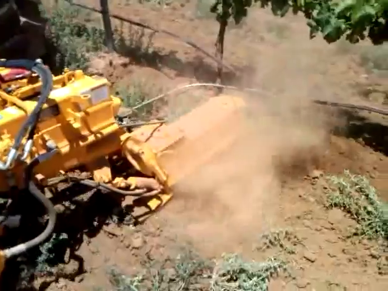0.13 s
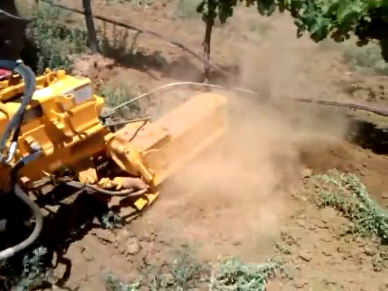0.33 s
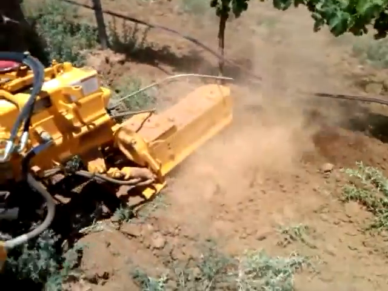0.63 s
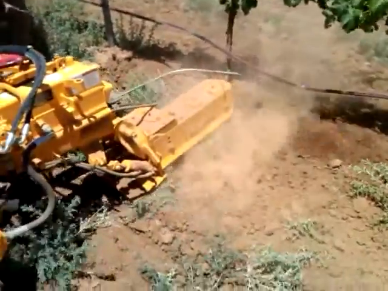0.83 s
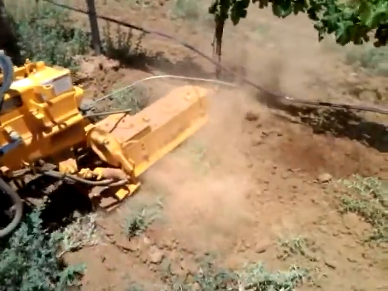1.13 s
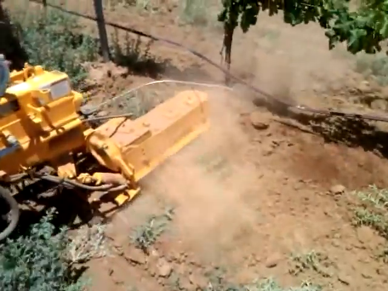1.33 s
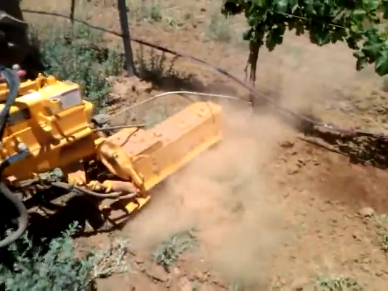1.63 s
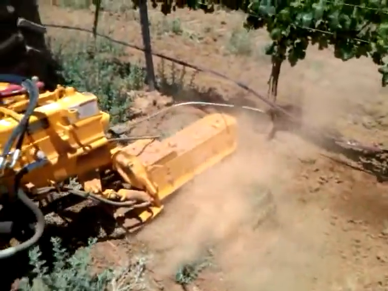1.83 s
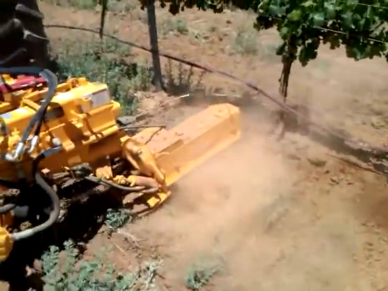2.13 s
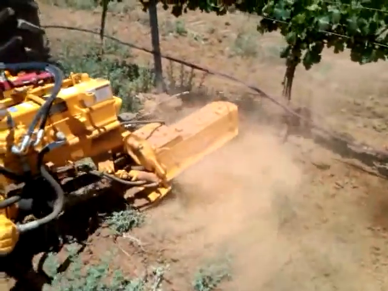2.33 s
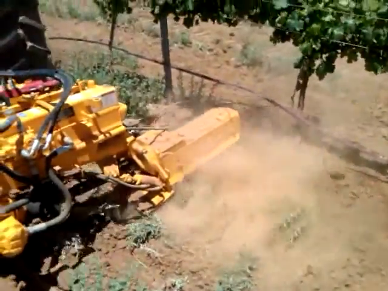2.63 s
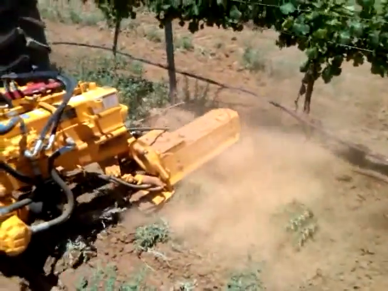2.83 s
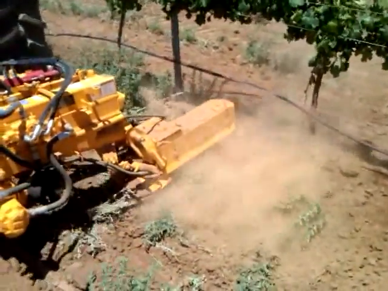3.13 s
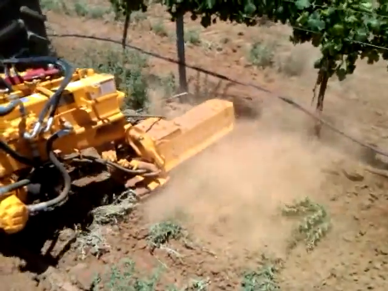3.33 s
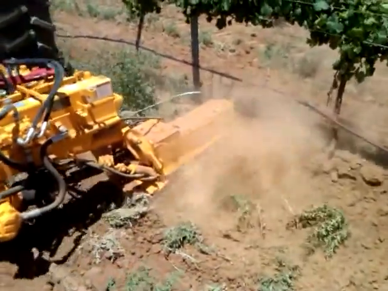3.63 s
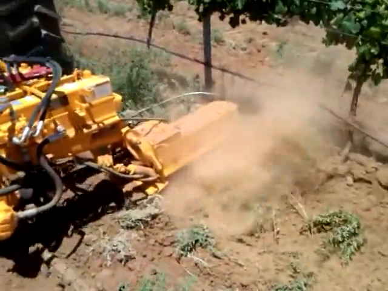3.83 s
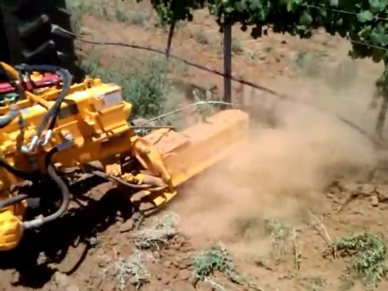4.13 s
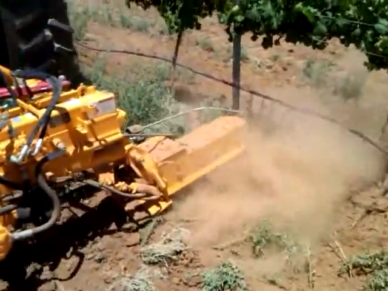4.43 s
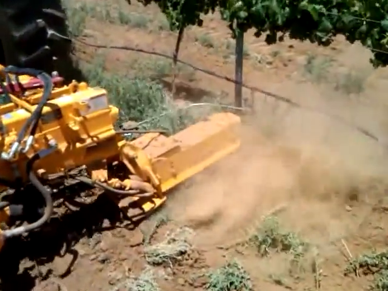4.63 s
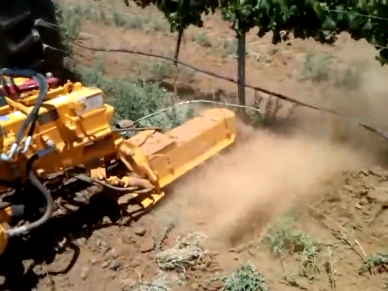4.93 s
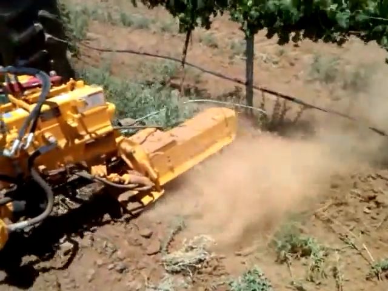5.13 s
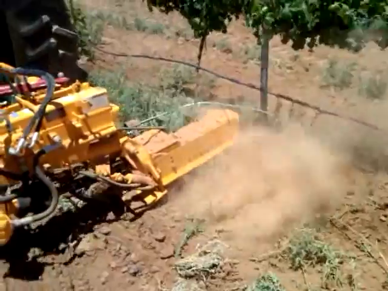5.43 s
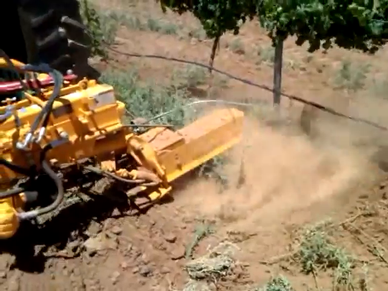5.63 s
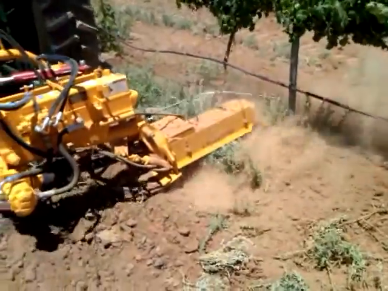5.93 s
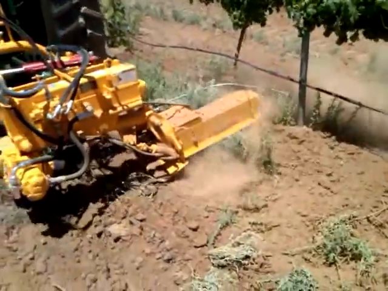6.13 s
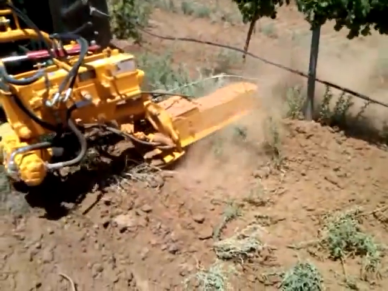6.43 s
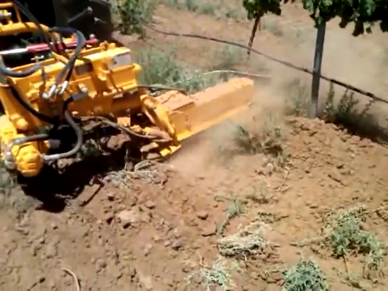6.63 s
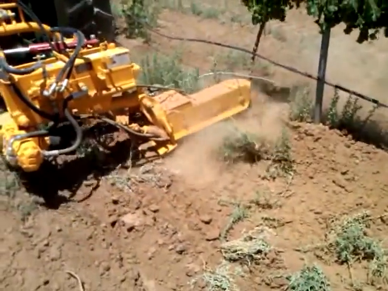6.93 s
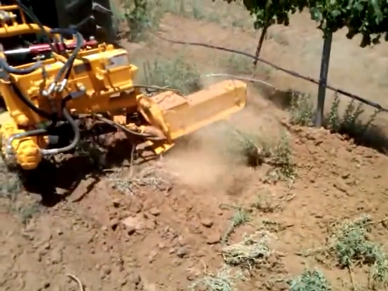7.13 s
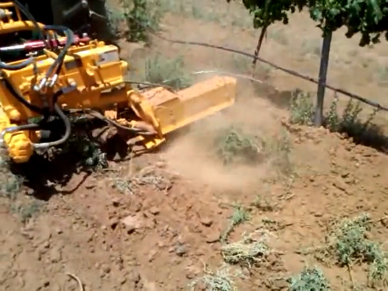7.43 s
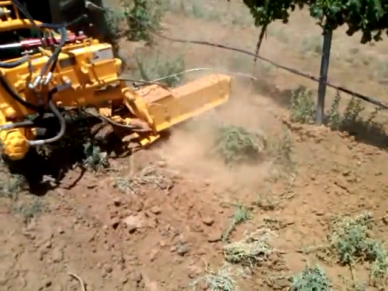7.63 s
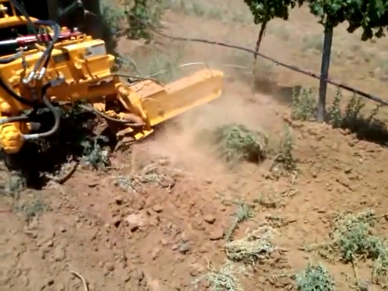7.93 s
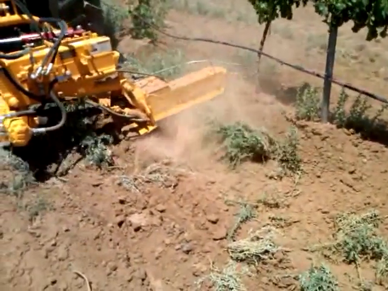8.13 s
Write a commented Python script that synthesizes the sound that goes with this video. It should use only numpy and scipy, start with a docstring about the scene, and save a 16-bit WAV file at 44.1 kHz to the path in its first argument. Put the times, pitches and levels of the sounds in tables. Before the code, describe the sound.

After a tiny silence, sound snaps on: low engine drone, crunching earth and grit spraying in quick rhythmic pulses, about seven a second. Steel rattles, stones ring dully and lumps of soil knock the hood. Rough wind rumble covers the opening and returns in the second half, where the clinks stop. Narrow, compressed phone sound, dry open air, treble flickering; the machine softens as it draws away.

```python
"""A tractor creeps along a vine row with a side-mounted rotary tiller, heard from a hand-held phone.
After a brief silence a click opens onto diesel drone, pump hum, gearbox whine, churned earth and strong wind.
For five seconds tines clink on stones and grit sprays once a turn; from the first second clods thud on the hood.
After a calmer spell, gusts return near 5 s, with a second click and spells of thin frozen treble.
Then the tractor draws away. Noise is shaped by spectra, struck parts are decaying sines, eddies are low pushes."""
import sys
import numpy as np
from scipy import signal
from scipy.fft import rfft, irfft, next_fast_len
from scipy.io import wavfile
from scipy.ndimage import uniform_filter1d, minimum_filter1d, map_coordinates

SR = 44100
rng = np.random.default_rng(int(sys.argv[2]) if len(sys.argv) > 2 else 0)


def put_to_file(sound):
    """Save the sound as 16-bit audio at rate SR, in the file named by the first command-line argument."""
    columns = np.atleast_2d(sound).T  # one column per channel
    safe = np.clip(columns, -1, 1)
    whole_steps = np.round(safe * 32767)
    wavfile.write(sys.argv[1], SR, whole_steps.astype(np.int16))


def makeup_ratio(level_db):
    """Linear amplitude ratio for a level in decibels (20 dB per factor of ten)."""
    decades = np.asarray(level_db, float) / 20
    return 10 ** decades


N = 365148

# engine loudness at the microphone as the tractor draws away: start_s [s], level_db [dB]
TRACTOR_LEVEL = [(0.1, -38), (1.0, -38), (1.7, -37.5), (2.7, -39), (4.0, -38), (5.3, -39.5), (6.3, -39),
                 (8.28, -42)]
# modes of the hood over the rotor: pitch_hz [Hz], level_db [dB], t60_s [s]
HOOD_MODES = [(694.7, -7, 0.17), (810.5, 4, 0.08), (950, -2, 0.06), (1248, -7.5, 0.12), (1847, -4.5, 0.046)]


def unit(x):
    """Scale to rms 1."""
    return x / np.sqrt(np.mean(x ** 2) + 1e-20)


def curves(rows):
    """One value per sample for each column after the time."""
    s, *cols = np.transpose(rows)
    return [np.interp(np.arange(N) / SR, s, c) for c in cols]


def wobble(rate):
    """A smooth random curve, rate knots a second (at most 200)."""
    knots = rng.standard_normal(N // 200)
    return map_coordinates(knots, [np.arange(N) * min(rate, 200) / SR])


def filtered(x, response):
    """x times a response of frequency."""
    m = next_fast_len(N + SR // 2)
    return irfft(rfft(x, m) * response(np.fft.rfftfreq(m, 1 / SR)), m)[:N]


def coloured(x, spectrum):
    """x shaped by (Hz, dB) points on a log axis, rms 1."""
    f, db = np.transpose(spectrum)

    def response(hz):
        return makeup_ratio(np.interp(np.log(hz + 1), np.log(f + 1), db, -120, -120))

    return unit(filtered(x, response))


def patchy(patchy_db, size=5):
    """White noise with patches of random gain in time and frequency."""
    z = signal.stft(rng.standard_normal(N), nperseg=512)[2]
    field = uniform_filter1d(rng.standard_normal(z.shape), size=size, axis=0)
    field = uniform_filter1d(field, size=size, axis=1)
    return signal.istft(z * makeup_ratio(patchy_db * unit(field)), nperseg=512)[1][:N]


def grains(per_s, spread_db):
    """Random impulses of either sign and uneven size, rms 1; spread_db makes a few much larger."""
    hit = rng.random(N) < per_s / SR
    size_db = spread_db * np.minimum(rng.exponential(size=N), 4)
    return unit(hit * rng.choice([-1, 1], N) * makeup_ratio(size_db))


def ring(modes, t, scatter_db, detune):
    """All modes of a struck part, at new strengths and slightly new pitches for each blow."""
    out = 0
    for hz, db, t60 in modes:
        decay = makeup_ratio(db + scatter_db * rng.standard_normal() - 60 * t / t60)
        out = out + decay * np.sin(2 * np.pi * hz * (1 + detune * rng.standard_normal()) * t)
    return out


def tractor():
    """Diesel drone pulsing with the firings, the pump's wavering hum, the cooling fan's hiss."""
    # spectrum of the diesel drone: freq_hz [Hz], density_db [dB per Hz, relative]
    drone_spectrum = [(15, -39), (25, -6), (70, -21), (106, -10), (135, -10.5), (171, -17), (187, -19),
                      (208, -24.5), (244, -29.5), (275, -17), (301, -5.5), (407, -7.5), (494, -13.5),
                      (521, -45.5), (569, -13.5), (660, -5), (796, -3), (1000, -6), (1150, -12),
                      (1700, -20), (2210, -33.5), (3740, -120)]
    # exhaust tones: multiple [of the firing rate], level_db [dB relative to the drone]
    exhaust_tones = [(2, -10), (3, -14), (6, -16)]
    # spectrum of the cooling fan: freq_hz [Hz], density_db [dB per Hz, relative]
    fan_spectrum = [(1760, -40.5), (3000, -11), (3310, -13.5), (3790, -4), (4440, -13), (5500, -9),
                    (5900, -4.5), (7030, -4), (7450, -24), (7600, -22.5), (9880, -59.5), (16700, -120)]
    firing_hz, block_t60_s = 50.98, .12  # the engine block rings on after each firing
    pump_hz, pump_db, fan_db = 186, -42.5, -66.5
    level_db, = curves(TRACTOR_LEVEL)
    cycle = 2 * np.pi * np.cumsum(firing_hz * (1 + 0.008 * wobble(6))) / SR
    pulsing = 1 + 0.12 * np.cos(cycle) + 0.039 * np.cos(cycle / 2)  # cylinders differ
    knocks = 0.47 * grains(per_s=120, spread_db=0.0)  # linkage and clods rattling

    fired = np.diff(np.floor(cycle / (2 * np.pi)), prepend=0)  # one impulse per firing
    fired = fired * (1 + .6 * np.cos(cycle / 2)) * makeup_ratio(1.5 * wobble(40))
    t = np.arange(SR // 8) / SR
    block_echo = rng.standard_normal(len(t)) * makeup_ratio(-60 * t / block_t60_s)
    block = unit(signal.fftconvolve(fired, block_echo)[:N])

    roar = unit(pulsing * patchy(patchy_db=2.0, size=4))
    drone = coloured(0.5 * block + roar + knocks, drone_spectrum)
    exhaust = sum(makeup_ratio(db + 2.1 * wobble(8.4)) * np.sin(k * cycle) for k, db in exhaust_tones)
    engine = makeup_ratio(level_db + 0.8 * wobble(9)) * (drone + exhaust)
    hum = np.sqrt(2) * np.sin(2 * np.pi * np.cumsum(pump_hz + .6 * wobble(8)) / SR)
    fan = coloured(pulsing * rng.standard_normal(N), fan_spectrum)
    return engine + makeup_ratio(pump_db + 0.83 * wobble(13)) * hum + makeup_ratio(fan_db) * fan


def gearbox():
    """Meshing teeth: a faint whine and its overtones, wavering with the load."""
    # rotor gearbox whine: start_s [s], pitch_hz [Hz], level_db [dB before the overtone balance]
    whine_course = [(0.1, 665, -56.5), (2, 664, -53.5), (4, 667.6, -60.5), (6, 663.7, -49),
                    (8.28, 665.6, -53.5)]
    # whine overtones: multiple [of the whine pitch], level_db [dB relative]
    whine_overtones = [(1, 4), (2, -3.5), (3, -10)]
    hz, db = curves(whine_course)
    phase = 2 * np.pi * np.cumsum(hz + 12 * wobble(25) + 5 * wobble(3)) / SR
    whine = sum(makeup_ratio(level + 3.7 * wobble(20)) * np.sin(k * phase) for k, level in whine_overtones)
    return makeup_ratio(db) * whine


def tiller():
    """The rotor churns earth; grit sprays against the hood, with a swing in level once a turn."""
    # thrown soil: start_s [s], level_db [dB], swing_db [dB per unit of the throw curve]
    soil_course = [(0.1, -49, -16), (0.3, -51.5, 8), (0.85, -52.5, -1), (1.05, -48.5, -1.5), (1.72, -50, 7),
                   (1.8, -56, 8), (2.3, -50.5, 4), (2.42, -56.5, 8), (2.75, -59.5, -4), (2.82, -54, 17),
                   (3.02, -55, -10), (3.1, -58.5, -12), (3.55, -56.5, 4), (4.05, -50.5, 8),
                   (4.25, -55.5, 7), (4.6, -51.5, 3), (4.75, -57, 17), (5.1, -58, 2.5), (5.45, -60, 3.5),
                   (6.4, -64.5, -3.5), (8.28, -72.5, -2.5)]
    # how hard the tines bite: start_s [s], churn_db [dB at the usual soil level]
    bite_course = [(0.1, -46), (0.6, -51), (1.2, -47.5), (2.4, -48.5), (3.4, -48.5), (4.2, -46.5),
                   (5.0, -46), (5.3, -48.5), (6.5, -48), (8.28, -49)]
    # spectrum of churned earth: freq_hz [Hz], density_db [dB per Hz, relative]
    churn_spectrum = [(710, -51.5), (1200, -6), (1330, -2.5), (1720, -6.5), (2000, -6), (2400, -10.5),
                      (2600, -14), (3210, -20), (3600, -24), (4680, -58), (7920, -120)]
    # spectrum of sprayed grit: freq_hz [Hz], density_db [dB per Hz, relative]
    soil_spectrum = [(1880, -22), (3200, -21), (3400, -12), (4030, -3.5), (4340, -1), (5050, -1.5),
                     (6300, 3), (7250, -6), (7600, -7.5), (9880, -52.5), (16700, -120)]
    first_throw_s, turn_s = 0.2186, 0.13627
    throw_rise, throw_fall = 0.15, 0.52  # in turns
    churn_follows, usual_soil_db = 0.36, -52.5  # the churn swings less than the thrown soil
    soil_db, swing_db = curves(soil_course)
    turn = (np.arange(N) / SR - first_throw_s) / turn_s % 1
    throw = np.exp(-turn / throw_fall) + np.exp((turn - 1) / throw_rise)
    soil_db = soil_db + swing_db * (throw - throw.mean()) + 1.4 * wobble(12)
    churn_db = curves(bite_course)[0] + churn_follows * (soil_db - usual_soil_db)

    clumps = wobble(30)
    churn = patchy(patchy_db=1.5, size=4) + .5 * grains(per_s=300, spread_db=2.0)
    churn = coloured(churn, churn_spectrum)
    soil = coloured(patchy(patchy_db=2.3) + .35 * grains(per_s=460, spread_db=7.0), soil_spectrum)
    return makeup_ratio(churn_db + 1.3 * clumps) * churn + makeup_ratio(soil_db + 0.5 * clumps) * soil


def rattle():
    """Loose steel pins, links and tines knock at random; each knock is one short decaying note."""
    per_s, low_hz, high_hz = 70, 620, 2600
    base_db, tilt_db, t60_s = -49, -5.5, 0.092  # base at 1 kHz, tilt per octave, mean t60
    when, pitch, size, life = rng.random((int(per_s * N / SR), 4)).T[..., None]
    hz = low_hz * (high_hz / low_hz) ** pitch
    t = np.arange(SR // 10) / SR
    strike_db = base_db + tilt_db * np.log2(hz / 1000) - 3.5 * np.log(size + .02)
    decay_db = -60 * t / (t60_s * (.5 + life))
    notes = makeup_ratio(strike_db + decay_db) * (1 - np.exp(-t / 0.0032)) * np.sin(2 * np.pi * hz * t)
    at = (when * N).astype(int) + np.arange(len(t))
    level_db, = curves(TRACTOR_LEVEL)
    return makeup_ratio(level_db - level_db.mean()) * np.bincount(at.ravel(), notes.ravel(), N + SR)[:N]


def gusting(law):
    """Level of one wind layer: calm air plus every gust's rise, hold and fall."""
    # gusts on the microphone: start_s [s], hold_s [s], level_db [dB before each layer's law],
    # speed [relative, about 0-1]
    gust_rows = [(0.144, 0.0087, -18.5, 0.57), (0.189, 0.015, -17, 0.74), (0.248, 0.017, -12, 0.64),
                 (0.319, 0.016, -12, 0.75), (0.359, 0.055, -14, 0.82), (0.459, 0.053, -12, 0.99),
                 (0.523, 0.13, -23, 1.08), (0.672, 0.069, -15.5, 1), (0.779, 0.08, -17.5, 0.9),
                 (0.831, 0.084, -14.5, 0.98), (0.99, 0.016, -24.5, 0.63), (1.023, 0.007, -32, 0.6),
                 (1.06, 0.0083, -24.5, 0.4), (1.159, 0.013, -31.5, 0.57), (1.267, 0.073, -42, 0.3),
                 (1.476, 0.12, -24.5, 0.08), (1.71, 0.06, -36.5, 0), (2.184, 0.061, -28, 0.14),
                 (2.433, 0.18, -41, 0.5), (2.776, 0.029, -31, 0.34), (2.86, 0.045, -28, 0.15),
                 (3.097, 0.013, -21.5, 0.38), (3.165, 0.02, -25.5, 0.1), (3.256, 0.071, -31, 0.12),
                 (3.859, .03, -46, 0.13), (4.357, 0.041, -38.5, 0.16), (4.541, 0.018, -34.5, 0.1),
                 (4.94, 0.034, -24.5, 0.51), (5.004, 0.029, -22, 0.13), (5.099, 0.03, -15, 0.6),
                 (5.17, 0.039, -22, 0.64), (5.228, 0.054, -10, 0.63), (5.307, 0.037, -14, 0),
                 (5.38, 0.014, -19, 0.77), (5.449, 0.07, -15.5, 0.65), (5.543, 0.018, -11.5, 0.25),
                 (5.63, 0.035, -17, 0.51), (5.71, .14, -17, 0.44), (5.897, 0.09, -14, 0.5),
                 (5.992, 0.085, -14.5, 0.51), (6.125, 0.12, -16.5, 0.43), (6.285, 0.011, -24, 0.32),
                 (6.358, 0.01, -30, 0.4), (6.315, 0.2, -35, 0.72), (6.531, 0.019, -23, 0.08),
                 (6.571, 0.02, -15, 0.6), (6.628, 0.022, -26, 0.67), (6.66, .03, -24.5, 0.52),
                 (6.738, .03, -30, 0.4), (6.786, 0.044, -33, 0.64), (6.858, 0.016, -25.5, 0.07),
                 (6.927, 0.039, -33, 0.09), (6.997, 0.016, -26.5, 0.02), (7.054, 0.025, -30, 0.18),
                 (7.107, 0.15, -34.5, 0.28), (7.266, 0.15, -39, 0.37), (7.447, 0.049, -27, 0.02),
                 (7.551, 0.021, -32, 0.37), (7.585, 0.023, -21.5, 0.06), (7.654, 0.084, -25, 0.03),
                 (7.768, 0.073, -21, 0.1), (7.912, 0.02, -29.5, 0.14), (8, 0.022, -29.5, 0.14),
                 (8.126, 0.015, -28, 0.66)]
    rise_db_per_s, fall_db_per_s = 649.5, 418
    over_db, speed_db, steep, calm_db = law
    s, hold, db, speed = np.transpose(gust_rows)[..., None]
    t = np.arange(0, N / SR, 1 / 300)
    rise_db = -rise_db_per_s * np.maximum(s - t, 0)
    fall_db = -fall_db_per_s * np.maximum(t - s - hold, 0)
    gust_db = db + over_db + speed_db * np.abs(speed) ** steep + rise_db + fall_db
    power = makeup_ratio(calm_db) ** 2 + np.sum(makeup_ratio(gust_db) ** 2, axis=0)
    return np.interp(np.arange(N) / SR, t, np.sqrt(power))


def shedding():
    """Eddies leave the microphone port in an unsteady train: a rough low tone gliding with the air."""
    # mean rate at which eddies peel off, one list for each spell of wind: start_s [s], rate_hz [Hz]
    shed_rates = [
        [(.14, 94.16), (.252, 69.8), (.306, 130), (.332, 100.7), (.39, 192.8), (.42, 240), (.45, 124.7),
         (.5, 170.2), (.53, 120), (.57, 189.9), (.612, 250), (.65, 150.5)],
        [(.66, 126.3), (.72, 110), (.76, 140.1), (.85, 105), (.91, 230.2), (.95, 150.3), (.984, 102.1),
         (1.02, 169.8), (1.07, 102), (1.172, 150.9), (1.2, 133.3)],
        [(1.44, 75.9), (1.508, 66), (1.57, 87), (1.65, 72)],
        [(3.08, 80), (3.152, 85.9), (3.202, 73.7), (3.234, 96.2), (3.306, 100), (3.35, 89)],
        [(4.9, 91.85), (5.024, 68.04), (5.1, 149.9), (5.18, 170), (5.226, 89.8), (5.274, 97.1), (5.338, 62.04),
         (5.37, 72.1)],
        [(5.38, 75), (5.47, 169.9), (5.5, 170.2), (5.532, 92.9), (5.57, 180), (5.6, 109.8), (5.652, 149.7),
         (5.706, 88.1), (5.79, 80), (5.86, 91.9)],
        [(5.87, 71.2), (5.91, 110.4), (5.94, 64.7), (6.0, 109.8), (6.08, 100), (6.13, 70.06), (6.194, 96.1),
         (6.294, 70.8), (6.35, 120.9)],
        [(6.5, 69.85), (6.53, 64.1), (6.568, 95), (6.588, 104.3), (6.648, 93), (6.7, 118), (6.72, 103.8)],
        [(7.55, 87), (7.6, 65.84), (7.654, 70.9), (7.684, 64.1), (7.722, 72), (7.774, 58.95), (7.9, 68.2)],
    ]
    hz, = curves(np.concatenate(shed_rates))
    unsteady_hz = hz * 2 ** (.14 * wobble(30) + .22 * wobble(110))
    phase = 2 * np.pi * np.cumsum(unsteady_hz) / SR
    tone = np.sin(phase) + 0.35 * np.sin(2 * phase + 1.2 * wobble(40))
    return unit(makeup_ratio(4.8 * wobble(60)) * tone)


def wind():
    """Eddies on the microphone port: slow rumble, with finer flutter and ripple as the air speeds up."""
    # spectrum of the slow eddies: freq_hz [Hz], density_db [dB per Hz, relative]
    rumble_spectrum = [(3, -10.5), (12, -2.5), (30, 3), (50, 1), (75, -4), (110, -7.5), (200, -35.5)]
    # spectrum of the faster eddies: freq_hz [Hz], density_db [dB per Hz, relative]
    flutter_spectrum = [(41, -27), (70, 2), (184, 4), (232, -2.5), (330, -12), (430, -45), (730, -120)]
    # spectrum of the finest eddies: freq_hz [Hz], density_db [dB per Hz, relative]
    ripple_spectrum = [(150, -28.5), (250, 0), (337, 1.5), (595, -12.5), (687, -13.5), (1100, -44),
                       (1430, -58.5), (2420, -120)]
    # laws: dB over the gust level at speed 0, dB added at speed 1, steepness, dB in calm air
    rumble_law, flutter_law = (-1, 1, 0, -47.5), (-13, 18.5, 0.57, -44)
    ripple_law, shed_law = (-21.5, 25.5, 1.12, -46.5), (-10, 18.5, 1.0, -61)
    eddies = grains(per_s=90, spread_db=2.5)  # each eddy pushes all bands at once
    lumps = makeup_ratio(2.8 * wobble(40))  # the air comes in lumps
    rumble = coloured(rng.standard_normal(N) + 0.47 * eddies, rumble_spectrum)
    rumble = unit(makeup_ratio(2.0 * wobble(12)) * rumble)
    flutter = unit(lumps * coloured(rng.standard_normal(N) + 0.57 * eddies, flutter_spectrum))
    ripple = coloured(rng.standard_normal(N) + 0.5 * eddies, ripple_spectrum)
    ripple = unit(lumps * makeup_ratio(1.8 * wobble(60)) * ripple)
    slow = gusting(rumble_law) * rumble + gusting(flutter_law) * flutter
    return slow + gusting(ripple_law) * ripple + gusting(shed_law) * shedding() + puffs()


def limited(x, top):
    """A fast limiter: most of the gain cut needed, held over some 11 ms, smoothed."""
    need = np.minimum(1, top / (np.abs(x) + 1e-9)) ** .8
    return x * uniform_filter1d(minimum_filter1d(need, size=500), size=350)


def flickering(x, from_hz):
    """Weaker treble patches drop out, leaving short thin tones; at times the whole treble dips."""
    # flicker of the treble: start_s [s], depth [0-2]
    flicker_depth = [(0.1, 1.1), (0.9, 1.0), (1.0, .25), (1.75, .25), (1.8, .45), (2.3, .35), (2.4, .7),
                     (2.46, .2), (2.76, .2), (2.8, .7), (3.4, .7), (4.1, .7), (4.9, .85), (5.12, 1.2),
                     (5.15, .5), (5.26, .5), (5.3, 1.2), (5.6, .6), (6.2, .6), (6.6, .25), (8.28, .25)]
    # brief dips of the whole treble: centre_s [s], width_s [s], depth_db [dB]
    treble_dips = [(0.34, 0.012, 10), (2.358, 0.008, 28), (2.78, .008, 12), (3.06, .007, 12),
                   (3.105, .008, 10), (3.375, 0.0074, 19), (3.685, .008, 14), (4.11, 0.011, 20),
                   (4.235, 0.0063, 16), (4.371, 0.013, 12), (4.65, .008, 12), (4.7, 0.012, 16),
                   (5.315, 0.015, 51), (5.59, .012, 14), (6.22, 0.0092, 8)]
    hz, t, z = signal.stft(x, SR, nperseg=640)
    power = uniform_filter1d(np.abs(z) ** 2, size=2, axis=0)
    around = uniform_filter1d(power, size=15, axis=0)
    around = np.abs(uniform_filter1d(around, size=9, axis=1))
    treble = 1 / (1 + (from_hz / (hz[:, None] + 1)) ** 6)
    depth = np.interp(t, *np.transpose(flicker_depth)) * treble
    keep = 1 / (1 + (depth * around / (power + 1e-20)) ** 6)
    lost_db = sum(db * np.exp(-((t - s) / width) ** 2) for s, width, db in treble_dips)
    return signal.istft(z * keep * makeup_ratio(-lost_db * treble), SR, nperseg=640)[1][:N]


def blips():
    """Faint high soft-edged beeps of one pitch in short runs, uneven in strength."""
    # runs of blips: start_s [s], count [blips]
    blip_runs = [(.138, 1), (.522, 2), (1.034, 5), (1.418, 6), (1.866, 3), (2.25, 2), (2.89, 1), (3.53, 10),
                 (4.746, 1), (5.62, 1)]
    pitch_hz, every_s, width_s, mean_db = 7953, .064, .006, -72
    times = [s + every_s * k for s, count in blip_runs for k in range(count)]
    strength, t = np.zeros(N), np.arange(-SR // 40, SR // 40) / SR
    at = np.round(np.array(times) * SR).astype(int)
    strength[at] = makeup_ratio(mean_db + 3 * rng.standard_normal(len(times)))
    beep = np.exp(-(t / width_s) ** 2) * np.sin(2 * np.pi * pitch_hz * t)
    return signal.fftconvolve(strength, beep, "same")


def puffs():
    """Single eddies on the microphone: a low push of about one cycle with a short bright edge."""
    # puffs: start_s [s], level_db [dB before the pulse shape], pitch_hz [Hz],
    # edge_db [dB relative to level_db]
    puff_rows = [(0.154, 0.5, 182, 8.5), (0.193, -22, 62.3, -21), (0.28, -5, 188, -17),
                 (0.412, 1, 147, -2.5), (0.443, -17.5, 122, -21.5), (0.469, -17.5, 75.4, -17.5),
                 (0.517, -14.5, 108, -13), (0.677, -22, 104.3, -14), (0.714, -14, 113, -19),
                 (0.84, -3, 62, -9), (0.885, -18, 167.8, -14), (1.022, -5.5, 180, -22),
                 (1.066, -19, 61.7, -24), (1.164, -8.5, 184, -19), (1.455, -18, 64.4, -16),
                 (1.52, -14, 69.7, -25), (1.552, -16, 80, -22), (1.575, -19, 74.8, -24),
                 (2.187, -22, 115.3, -24), (3.098, -4.5, 91.9, -18), (3.87, -27, 45, -25),
                 (4.539, -17, 45, -18), (4.931, -12.5, 109, -20), (5.171, 12, 195.8, -20),
                 (5.446, -1, 166, -24), (5.563, 7, 188.3, -14), (5.598, -6, 78.13, -13.5),
                 (6.56, -5.5, 98.35, -13), (6.632, -23, 167.4, -18), (6.655, -10, 95, -15),
                 (6.992, -14, 54.6, -30), (7.599, -18, 60.4, -5), (7.787, -10.5, 60.96, -30),
                 (7.835, -10.5, 54.6, -25), (8.131, -11, 136.7, -34)]
    out, t = np.zeros(N + SR), np.arange(SR // 8) / SR
    for s, db, hz, edge_db in puff_rows:
        u = t * hz / 0.74
        push = u * np.exp(-u) * np.sin(2 * np.pi * hz * t + 2 * np.pi * rng.random())
        edge_shape = t / 0.0014 * np.exp(-t / 0.0014)
        edge_hz = 470 * (1 + 0.074 * rng.standard_normal())
        edge = makeup_ratio(edge_db) * edge_shape * np.sin(2 * np.pi * edge_hz * t)
        out[round(s * SR):][:len(t)] += makeup_ratio(db + 0.5) * (push + edge)
    return out[:N]


def clinks():
    """Each stone scrapes and rings a tine and thuds on the hood."""
    # tines on stones: start_s [s], level_db [dB before each part's offset], thud_db [dB relative]
    stone_hits = [(0.1567, -34, 17), (0.2186, -26.5, -3.5), (0.3543, -32, -7), (0.491, -29.5, 4),
                  (0.6282, -27.5, -3), (0.8008, -34.5, 21), (1.1684, -32, -2), (1.3046, -25.5, -1),
                  (1.4408, -22.5, 8), (1.577, -26.5, 9), (1.6962, -32, 16.5), (1.8564, -29.5, 8),
                  (1.9911, -24.5, 6.5), (2.1273, -27.5, 0.5), (2.2645, -29.5, -6), (2.3692, -52, 10),
                  (2.5403, -34.5, -2), (2.8067, -42, 9), (2.9449, -48, 6.5), (3.0023, -33.5, -3),
                  (3.0686, -47, 10), (3.116, -38, -4), (3.1619, -39, 6), (3.2208, -32, 8.5),
                  (3.4612, -46, -6), (3.5086, -33.5, 7), (3.6304, -31.5, 4), (3.7266, -32, 0),
                  (3.9002, -48, 14), (4.0055, -38, -10), (4.1337, -47, 10), (4.1736, -26, 5),
                  (4.2779, -30.5, -6), (4.444, -28, -2), (4.5483, -27, 1), (4.7154, -26, 6.5),
                  (4.8192, -31, -1), (4.9873, -24, -4), (5.0411, -40, 9), (5.0915, -33.5, 16)]
    # modes of the tine steel: pitch_hz [Hz], level_db [dB relative], t60_s [s]
    steel_modes = [(2840, 1, .08), (3210, -3, .07), (3560, -5, .06), (3820, -4, .05), (4400, 1, .09),
                   (5340, 0, .09), (5900, -4, .06), (6170, -1, .07), (6450, 0, .07)]
    # spectrum of stone scraping along a tine: freq_hz [Hz], density_db [dB per Hz, relative]
    scrape_spectrum = [(1500, -31), (2300, -3.5), (2900, 1.5), (3500, -7.5), (4340, -7.5), (6300, 0),
                       (7250, -7.5), (7600, -11), (9880, -52.5), (16700, -120)]
    out, scrapes, t = np.zeros(N + SR), np.zeros(N + SR), np.arange(SR // 4) / SR
    rise = 1 - np.exp(-t / .004)
    for s, db, thud_db in stone_hits:
        steel = makeup_ratio(db - 20) * ring(steel_modes, t, scatter_db=3, detune=.0012)
        thud = makeup_ratio(db + thud_db - 15.5) * ring(HOOD_MODES, t, scatter_db=6.0, detune=.05)
        out[round(s * SR):][:len(t)] += rise * (steel + thud)
        scrapes[round(s * SR):][:len(t)] += rise * makeup_ratio(db - 17 - 60 * t / .12)
    return out[:N] + scrapes[:N] * coloured(rng.standard_normal(N), scrape_spectrum)


def pings():
    """Pebbles ping on the steel, one short decaying note each."""
    # pebbles: start_s [s], level_db [dB before the soft onset], pitch_hz [Hz]
    pebble_hits = [(0.633, -50, 4050), (3.725, -47, 3800), (3.765, -41, 1390), (4.551, -53, 3200),
                   (4.716, -48, 2000), (7.98, -50, 2000)]
    t60_s = .07
    out, t = np.zeros(N + SR), np.arange(SR // 8) / SR
    rise = 1 - np.exp(-t / 0.003)
    for s, db, hz in pebble_hits:
        out[round(s * SR):][:len(t)] += rise * ring([(hz, db, t60_s)], t, scatter_db=0, detune=0)
    return out[:N]


def clods():
    """Lumps of earth thud on one panel of the hood or another; bright ones wake its upper modes."""
    # clods: start_s [s], level_db [dB before an 8 dB cut and the mode levels],
    # panel_hz [Hz, main pitch of the panel that is hit], brightness [0-1]
    clod_hits = [(1.006, -25.5, 980, 0.1), (1.447, -23.5, 698, 0.36), (1.64, -26, 863, 0.02),
                 (1.761, -24, 815, 0.3), (2.221, -29, 792, 0.3), (2.358, -35, 790, 0.33),
                 (2.798, -25.5, 778, 0.2), (3.081, -25, 895, 0.32), (3.725, -28, 696, 0.19),
                 (3.907, -34, 950, 0.4), (3.98, -25, 967, 0.3), (4.085, -33, 792, 0.2),
                 (4.144, -23, 820, 0.3), (4.185, -26, 810, 0.2), (4.347, -25, 800, 0.3),
                 (4.475, -26.5, 823, 0.3), (4.767, -23, 812, 0), (4.848, -23.5, 790, 0.25),
                 (4.924, -30, 730, 0.16), (5.098, -25, 802, 0.32), (5.448, -21.5, 671, 0.24),
                 (5.512, -24, 820, 0.24), (6.247, -22.5, 777, 0.31), (6.63, -29, 654, 0.28),
                 (6.817, -23.5, 685, 0.31), (7.088, -30, 774, 0.29)]
    hood_main_hz = 810
    out, t = np.zeros(N + SR), np.arange(SR // 8) / SR
    rise = 1 - np.exp(-t / 0.00098)
    for s, db, panel_hz, bright in clod_hits:
        modes = []
        for hz, level, t60 in HOOD_MODES:
            tilt_db = 12 * (bright - .5) * np.log2(hz / hood_main_hz)
            modes.append((hz * panel_hz / hood_main_hz, level + tilt_db, t60))
        thud = ring(modes, t, scatter_db=2.0, detune=0.01)
        out[round(s * SR):][:len(t)] += makeup_ratio(db - 8) * rise * thud
    return out[:N]


def freezing(x):
    """In each spell the treble noise gives way to thin uneven tones that swell and fade one by one."""
    # frozen spells: start_s [s], length_s [s], level_db [dB], lost [share of the treble taken away]
    frozen_spells = [(5.145, .115, -64, .97), (5.39, .11, -66, .85), (5.635, .185, -65, .97),
                     (6.015, .185, -65, .85), (6.335, .115, -66, .75)]
    low_hz, high_hz = 2700, 7200
    t = np.arange(N) / SR
    treble = filtered(x, lambda hz: 1 / (1 + (low_hz / (hz + 1)) ** 12))
    out = x.copy()
    for s, length, db, lost in frozen_spells:
        span = slice(round(s * SR), round((s + length) * SR))
        gate = np.clip(np.minimum(t[span] - s, s + length - t[span]) / .008, 0, 1)
        place, size, start, sway = rng.random((4, 30, 1))  # 30 tones
        tone_db = 12 * size + 7 * np.sin(2 * np.pi * (8 * sway * t[span] + size))
        tone_hz = low_hz + (high_hz - low_hz) * place
        tones = makeup_ratio(tone_db) * np.sin(2 * np.pi * (tone_hz * t[span] + start))
        out[span] += gate * (makeup_ratio(db) * unit(tones.sum(axis=0)) - lost * treble[span])
    return out


def scene():
    """Machine and wind at one microphone."""
    machine = tractor() + gearbox() + tiller() + rattle()
    hits = clinks() + pings() + clods()
    return (machine + wind() + hits)[None]


def top_cut(x):
    """Nothing passes above the cut-off."""
    return signal.sosfilt(signal.butter(12, 16700, fs=SR, output="sos"), x)


def record(dry):
    """A narrow-band phone that limits its bass band; sound starts abruptly, and jumps with a click."""
    # clicks: start_s [s], jump [amplitude before the last low-pass]
    click_jumps = [(0.0966, 0.27), (5.4233, -0.19)]
    start_s, mic_top_hz, top_hz, hiss_db = 0.0966, 7420, 16700, -95
    t = np.arange(N) / SR
    x = filtered(dry[0], lambda hz: 1 / (1 + (hz / mic_top_hz) ** 90))
    bass = filtered(x, lambda hz: 1 / (1 + (hz / 850) ** 4))
    upper = freezing(flickering(x - bass, from_hz=3000))
    x = upper + limited(bass, top=.26)
    hiss = makeup_ratio(hiss_db) * rng.standard_normal(N)
    x = (x + blips() + hiss) * (t > start_s)
    for s, jump in click_jumps:
        x = x + jump * (t > s) * np.exp(-np.abs(t - s) / 0.0018)
    mix = filtered(x, lambda hz: 1 / (1 + (hz / top_hz) ** 80))[None]
    return top_cut(mix)


dry = scene()
out = record(dry)
put_to_file(out)
```